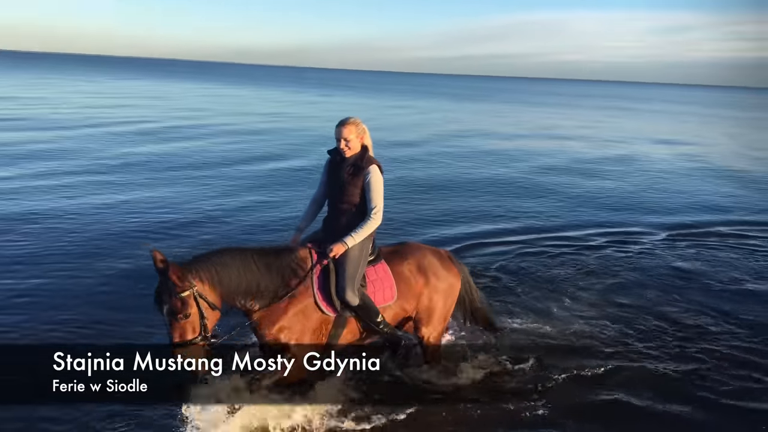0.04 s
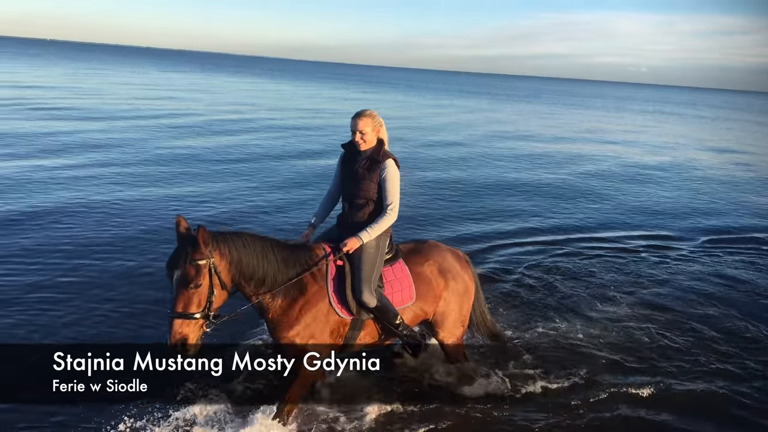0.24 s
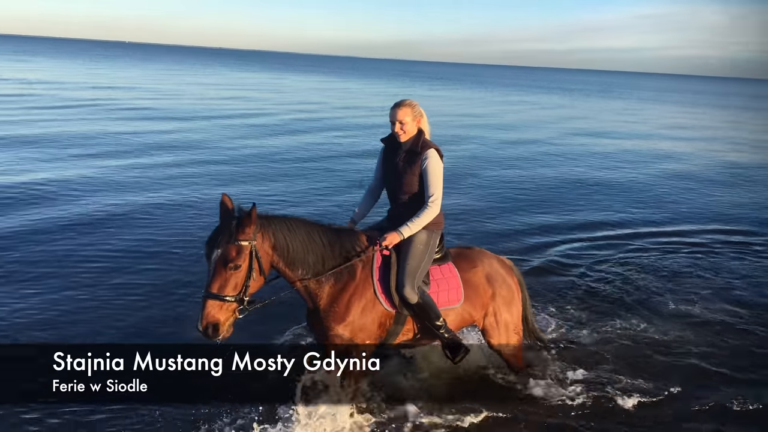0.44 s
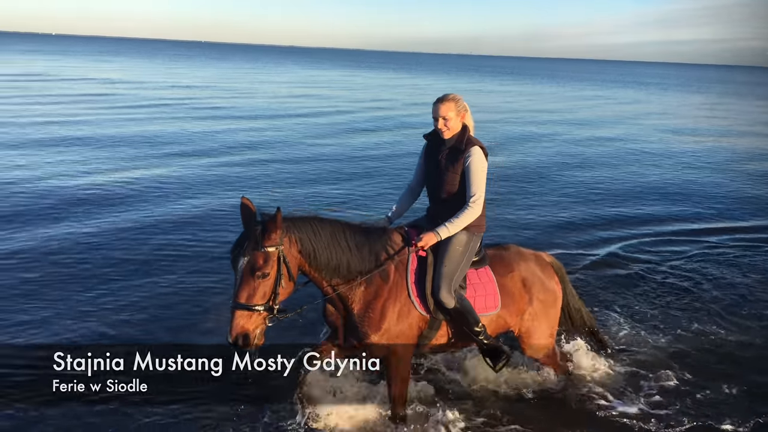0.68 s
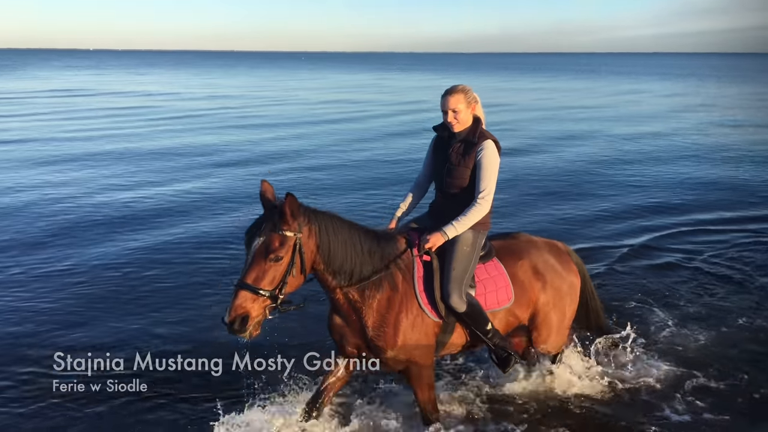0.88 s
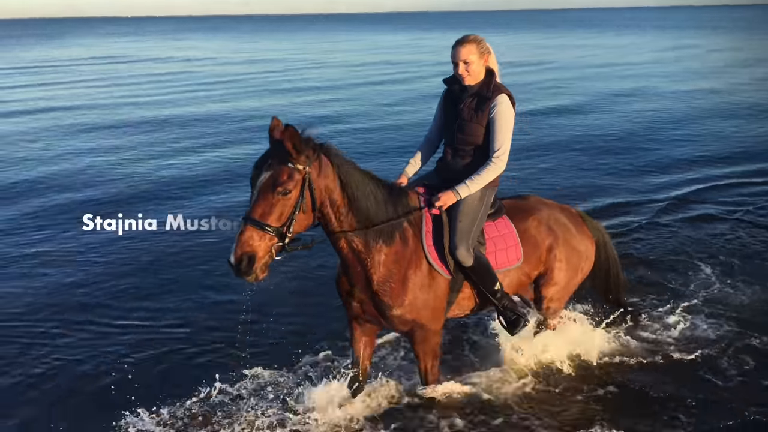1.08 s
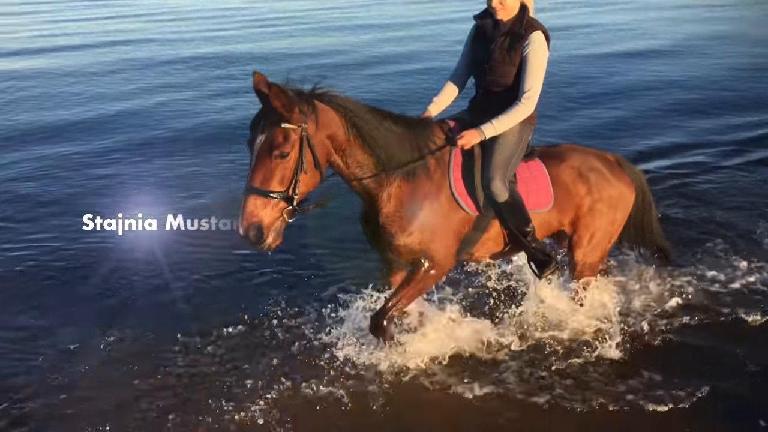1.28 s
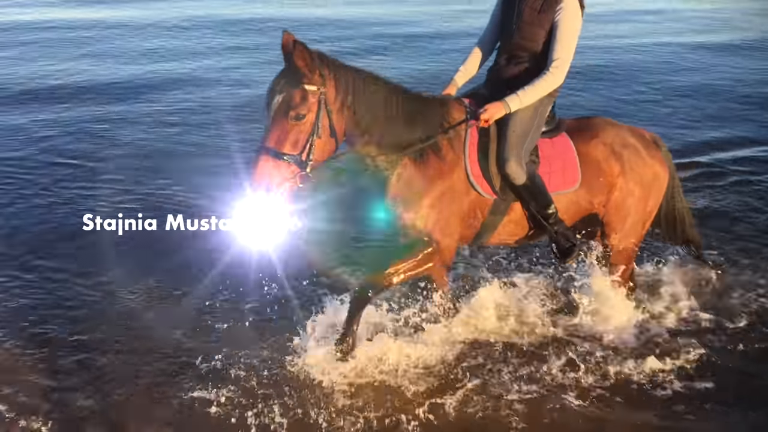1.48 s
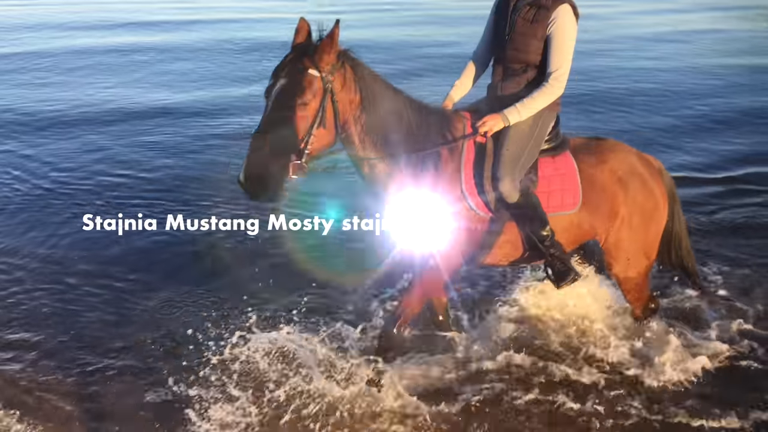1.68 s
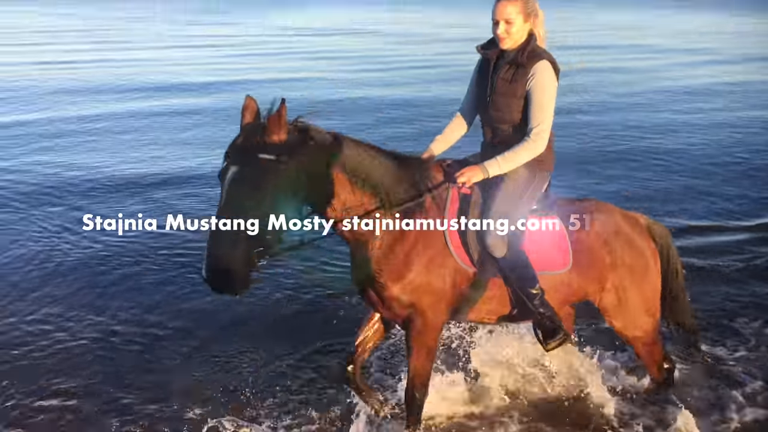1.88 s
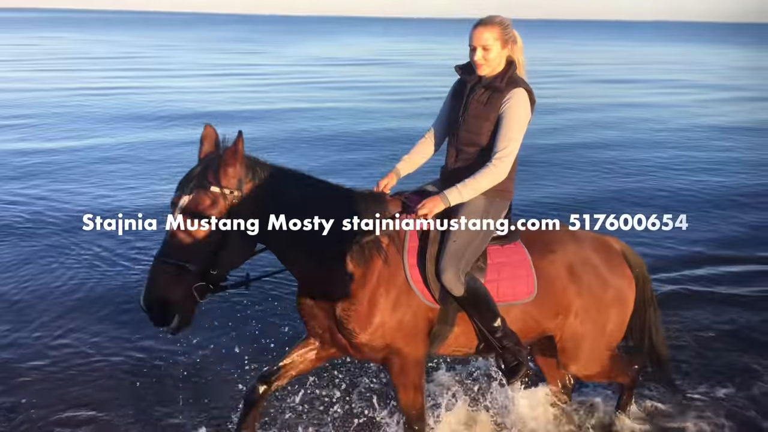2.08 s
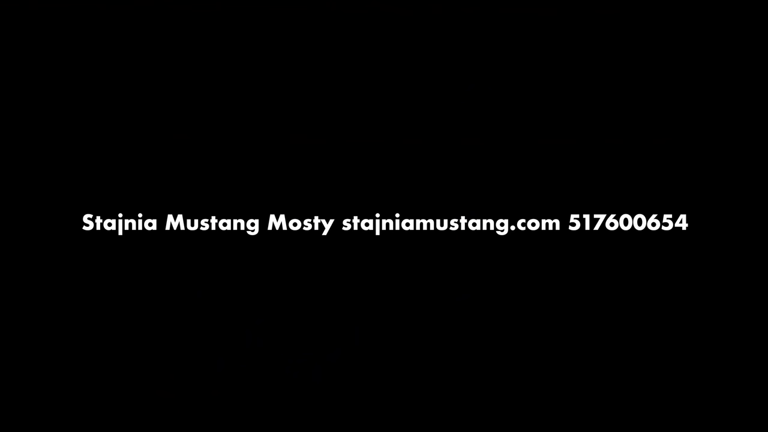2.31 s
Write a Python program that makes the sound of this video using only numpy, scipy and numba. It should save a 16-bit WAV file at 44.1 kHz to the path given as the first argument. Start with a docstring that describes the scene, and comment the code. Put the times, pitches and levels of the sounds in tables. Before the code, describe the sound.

A horse wades through shallow sea water, splashing steadily with deep plunging gulps.

```python
"""Shallow sea water: a horse wades through, close by, in mono.
Each plunging leg traps big air pockets that boom briefly; the churned water rings with bubbles,
and thrown spray patters back on the surface. A tack buckle tinkles; wind rumbles faintly.
The sound stops abruptly."""
import sys
import numpy as np
from scipy import signal
from scipy.fft import rfft, irfft, next_fast_len
from scipy.io import wavfile
from numba import njit

SR = 44100
rng = np.random.default_rng(int(sys.argv[2]) if len(sys.argv) > 2 else 0)


def wav_record(signal):
    """Record a signal, one row per channel, as 16-bit PCM in the file named by sys.argv[1]."""
    frames = np.transpose(np.atleast_2d(signal))
    bounded = np.clip(frames, -1, 1)
    # unit amplitude maps onto the largest positive 16-bit level
    quanta = np.round(bounded * 32767).astype(np.int16)
    wavfile.write(sys.argv[1], SR, quanta)


N = 108045
TIME_S = np.arange(N) / SR

# microphone colour on the splashes, notch near 4.9 kHz, dull above 10 kHz: (frequency [Hz], gain [dB])
SPLASH_MIC_COLOUR = [(300, -9.5), (420, -1.5), (560, 3.5), (800, 1), (1300, 1.5), (2100, -.5), (2750, -4.5),
                     (3300, -2.5), (4300, -7.5), (4900, -14.5), (5700, -9.5), (6700, -5.5), (8300, -7),
                     (9400, -11), (10400, -20), (13000, -22), (15700, -26)]


def from_db(db):
    """Decibels to gain."""
    return 10 ** (np.asarray(db) / 20)


def unit_rms(x):
    """Scale to unit rms."""
    return x / np.sqrt(np.mean(x ** 2) + 1e-20)


def per_sample(rows):
    """Interpolate (time [s], values...) rows; one curve per value column."""
    times_s, *columns = np.transpose(rows)
    return [np.interp(TIME_S, times_s, column) for column in columns]


def drift(cutoff_hz):
    """Low-passed noise, unit rms."""
    lowpass = signal.butter(2, cutoff_hz, fs=SR, output="sos")
    return unit_rms(signal.sosfilt(lowpass, rng.standard_normal(N + SR))[SR:])


def colour(x, spectrum):
    """Minimum-phase filter from (frequency [Hz], gain [dB]) rows; output at unit rms."""
    size = next_fast_len(N + SR // 4)
    hz, db = np.transpose(spectrum)
    bins_hz = np.fft.rfftfreq(size, 1 / SR)
    gain_db = np.interp(np.log(bins_hz + 1), np.log(hz), db)
    cepstrum = irfft(np.log(from_db(gain_db)), size)
    cepstrum[1:size // 2] *= 2  # fold onto the causal half
    cepstrum[size // 2 + 1:] = 0
    response = np.exp(rfft(cepstrum))
    return unit_rms(irfft(rfft(x, size) * response, size)[:N])


def ring(start_s, hz, t60_s):
    """Damped unit sine: a two-pole resonator struck once."""
    click = np.arange(N) == int(start_s * SR)
    radius = from_db(-60 / (t60_s * SR))
    step_rad = 2 * np.pi * hz / SR
    feedback = [1, -2 * radius * np.cos(step_rad), radius * radius]
    return signal.lfilter([0, np.sin(step_rad)], feedback, click + 1e-18)


@njit
def rising_rings(start_samples, heights, steps_rad, life_samples, rise):
    """Sum of sines, each gliding up by the fraction `rise` while it decays 60 dB."""
    out = np.zeros(N)
    for k, start in enumerate(start_samples):
        for i in range(min(int(life_samples[k]), N - start)):
            age = i / life_samples[k]
            phase = steps_rad[k] * i * (1 + rise * age / 2)
            out[start + i] += heights[k] * np.exp(-np.log(1000) * age) * np.sin(phase)
    return out


def bubbles(low_hz, high_hz, per_s, t60_cycles, spread_db):
    """Random rising bubble rings over a noise wash of countless tiny ones; unit rms."""
    ring_log_spread, wash_gain = 0.26, 0.64
    high_hz = min(high_hz, .45 * SR)
    chance, band_position, polarity = rng.random((3, N))
    size_db = spread_db * np.minimum(rng.exponential(1, N), 4)
    ring_stretch = np.exp(ring_log_spread * rng.standard_normal(N))
    born = np.flatnonzero(chance < per_s / SR)
    hz = low_hz * (high_hz / low_hz) ** band_position[born]
    t60_s = t60_cycles / hz * ring_stretch[born]
    heights = hz * from_db(size_db[born]) * np.sign(polarity[born] - .5)
    cloud = rising_rings(born, heights, 2 * np.pi * hz / SR, t60_s * SR, rise=0.071)
    band = signal.butter(2, [low_hz, high_hz], "band", fs=SR, output="sos")
    wash = signal.sosfilt(band, rng.standard_normal(N))
    return unit_rms(signal.sosfilt(band, unit_rms(cloud) + wash_gain * unit_rms(wash)))


def wind():
    """Faint gusting rumble."""
    # gusts: (time [s], level [dB])
    gusts = [(0, -41), (.15, -63), (.3, -48.5), (.45, -51), (.65, -45.5), (.9, -53.5), (1.08, -48),
             (1.2, -52), (1.42, -44.5), (1.6, -55), (1.77, -50), (2.05, -53.5), (2.2, -58)]
    # rumble spectrum: (frequency [Hz], gain [dB])
    spectrum = [(20, -28), (32, -11), (48, 1), (70, -4), (110, -2), (200, -5), (400, -7.5), (1000, -43.5)]
    level_db, = per_sample(gusts)
    waver_db = 1.8 * drift(cutoff_hz=2.9)
    return from_db(level_db + waver_db) * colour(rng.standard_normal(N), spectrum)


def tack():
    """Thin metal pings from a bridle buckle."""
    # buckle pings: (time [s], pitch [Hz], peak [dB])
    pings = [(.272, 12950, -56), (.300, 12570, -54), (2.124, 13000, -42)]
    return sum(from_db(db) * ring(start_s, hz, t60_s=0.053) for start_s, hz, db in pings)


def gurgle():
    """Deep bubbles in the wake of the legs."""
    # wake strength: (time [s], relative level [dB])
    wake = [(0, -35), (.05, -42), (.16, -48.5), (.3, -45.5), (.5, -42.5), (.65, -39.5), (.85, -48),
            (.96, -38.5), (1.15, -46.5), (1.45, -43), (1.65, -45.5), (2.0, -41), (2.2, -53.5)]
    level_db, = per_sample(wake)
    return from_db(level_db - 1.5) * bubbles(154.4, 348, per_s=170, t60_cycles=14.2, spread_db=3.1)


def slaps():
    """Sheets of water land in short bright noise bursts."""
    # landings: (time [s], level [dB], decay time constant [s])
    landings = [(0.117, -37, .004), (.361, -36.5, .006), (0.5767, -45, .0012), (.816, -34, 0.0054),
                (1.033, -30, 0.0016), (1.249, -43, .004), (2.021, -31.5, .006), (2.132, -45, .008)]
    envelope = np.zeros(N)
    for start_s, db, decay_s in landings:
        age_s = TIME_S - start_s
        envelope += from_db(db) * (age_s >= 0) * np.exp(-np.abs(age_s) / decay_s)
    return envelope * colour(rng.standard_normal(N), SPLASH_MIC_COLOUR)


def plops():
    """Lone bubbles ring out above the churn."""
    # lone bubbles: (time [s], pitch [Hz], peak [dB], t60 [s])
    lone_bubbles = [(.426, 2700, -29, .018), (.518, 2940, -28, .012), (0.534, 4170, -27, 0.009),
                    (.553, 5800, -36, .005), (.576, 5430, -23, 0.002), (.577, 756, -35, 0.091),
                    (.705, 2370, -26, 0.027), (.778, 630, -29.5, 0.057), (1.021, 567, -26, 0.07),
                    (1.205, 568, -27, 0.03), (1.264, 546, -28.5, 0.057), (1.339, 4030, -29, 0.013),
                    (1.795, 3200, -29.5, 0.028), (1.905, 528, -26, 0.056)]
    return sum(from_db(db) * ring(start_s, hz, t60_s) for start_s, hz, db, t60_s in lone_bubbles)


def splashing():
    """Large bubbles, fine bubbles and spray, swelling together as clumps of water land."""
    # churned water: (time [s], relative level [dB])
    churn_levels = [(0.0, -39.5), (0.03, -43), (0.2, -43), (0.24, -36.5), (0.32, -43.5), (0.81, -38.5),
                    (0.98, -39.5), (1.03, -38), (1.05, -40), (1.19, -39.5), (1.21, -37), (1.24, -39),
                    (1.25, -34.5), (1.36, -38), (1.9, -36), (1.91, -35), (1.94, -37.5), (2.21, -39)]
    # fine bubbles and spray: (time [s], relative fizz level [dB], relative spray level [dB])
    fine_levels = [(0.0, -48.5, -49.5), (0.05, -46.5, -54), (0.12, -40, -46.5), (0.15, -48.5, -48),
                   (0.22, -40, -44), (0.28, -40.5, -47.5), (0.31, -47, -49), (0.47, -39.5, -43.5),
                   (0.6, -43.5, -50), (0.65, -43.5, -48.5), (0.69, -41.5, -43), (0.71, -40, -46),
                   (0.72, -40.5, -44.5), (1.04, -41.5, -47), (1.05, -43, -47), (1.27, -39, -41.5),
                   (1.29, -39.5, -46), (1.34, -40.5, -43), (1.37, -41, -47.5), (1.57, -36, -40),
                   (1.69, -37.5, -39.5), (1.82, -38, -43.5), (2.1, -39.5, -42.5), (2.21, -34.5, -38.5)]
    churn_db, = per_sample(churn_levels)
    fizz_db, spray_db = per_sample(fine_levels)
    churn = bubbles(389, 2254, per_s=2000, t60_cycles=22, spread_db=2.5)
    fizz = bubbles(1820, 5540, per_s=2800, t60_cycles=34, spread_db=2.5)
    spray = bubbles(3680, 19000, per_s=7000, t60_cycles=19, spread_db=1)
    water = from_db(churn_db - 1) * colour(churn, SPLASH_MIC_COLOUR)
    water += from_db(fizz_db - 0.5) * colour(fizz, SPLASH_MIC_COLOUR)
    water += from_db(spray_db + 1.5) * colour(spray, SPLASH_MIC_COLOUR)
    clumps_db = 0.5 * drift(cutoff_hz=45)
    return water * from_db(clumps_db)


def air_pockets():
    """Air trapped under a leg swells, booms a few cycles and dies, rising slightly in pitch."""
    # booms: (time [s], start pitch [Hz], peak [dB], swell time [s])
    booms = [(.002, 265, -36, 0.0074), (0.196, 166.4, -21, 0.012), (0.2291, 174, -17, 0.0083),
             (.240, 99, -24.5, 0.011), (0.253, 245, -28.5, 0.01), (0.416, 110, -36.5, 0.011),
             (0.555, 153, -25.5, 0.01), (0.57, 285, -32.5, 0.013), (.594, 90, -39, 0.011),
             (0.605, 315.4, -34, 0.022), (1.0, 208, -19, 0.0049), (1.02, 244, -22, 0.0046),
             (1.034, 110, -36, .012), (1.2601, 166.2, -12.5, 0.0096), (1.289, 176, -18.5, 0.0071),
             (1.303, 207, -25.5, 0.0071), (1.571, 293, -31.5, 0.0073), (1.730, 262, -32, 0.0064),
             (1.9, 185, -13, 0.007), (1.916, 245, -22, 0.012), (1.929, 168, -19.5, 0.0065),
             (1.946, 231, -29.5, 0.013), (2.073, 74.8, -39.5, 0.011)]
    swell_exponent, glide_per_s, wobble_depth = 3.02, 0.88, 0.089
    out = np.zeros(N)
    for start_s, hz, db, swell_s in booms:
        age_s = np.maximum(TIME_S - start_s, 0)
        envelope = (age_s / swell_s * np.exp(1 - age_s / swell_s)) ** swell_exponent
        phase = 2 * np.pi * hz * age_s * (1 + glide_per_s * age_s)
        out += from_db(db) * envelope * np.sin(phase)
    return out * (1 + wobble_depth * drift(cutoff_hz=110))


def scene():
    """Mono sum on two identical channels."""
    water = splashing() + gurgle() + air_pockets() + plops() + slaps()
    return np.tile(water + tack() + wind(), (2, 1))


def record(dry):
    """Bass cut, quick fade-out, steep treble cut."""
    low_cut_hz, high_cut_hz = 45, 15700
    end_s, fade_s = 2.226, 0.022
    highpass = signal.butter(3, low_cut_hz, "high", fs=SR, output="sos")
    lowpass = signal.ellip(10, .1, 80, high_cut_hz, fs=SR, output="sos")
    fade = np.clip((end_s - TIME_S) / fade_s, 0, 1)
    return signal.sosfilt(lowpass, fade * signal.sosfilt(highpass, dry))


dry = scene()
out = record(dry)
wav_record(out)
```